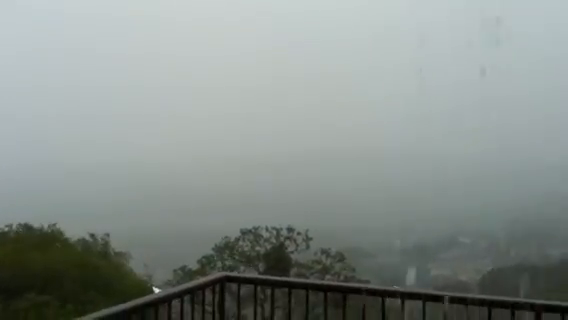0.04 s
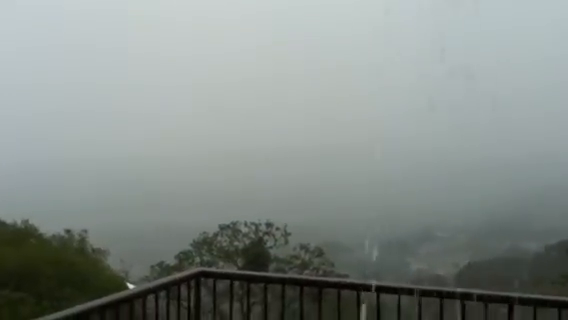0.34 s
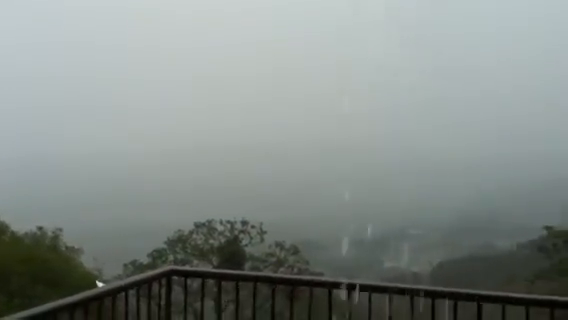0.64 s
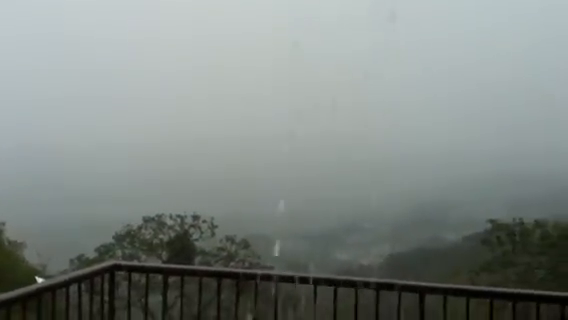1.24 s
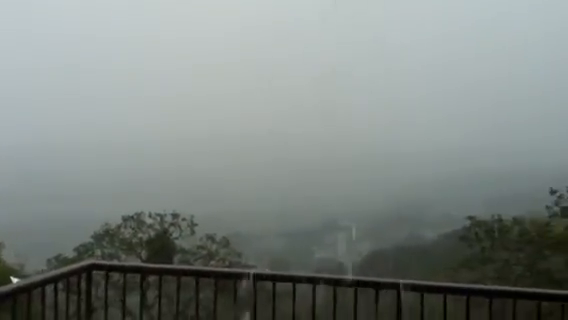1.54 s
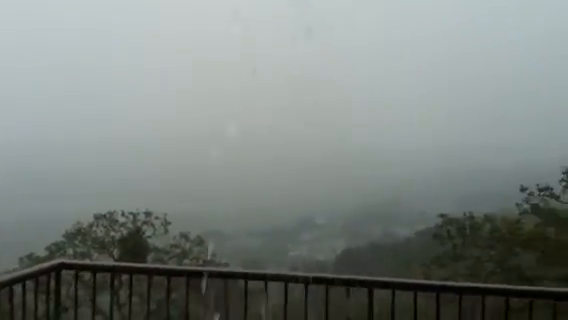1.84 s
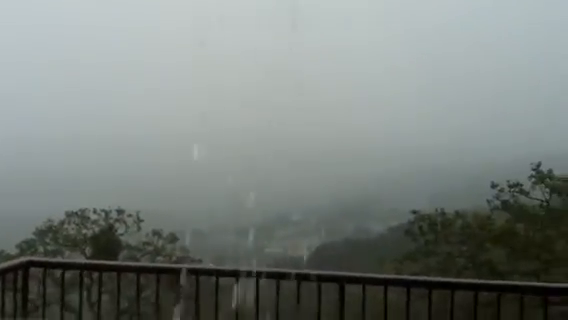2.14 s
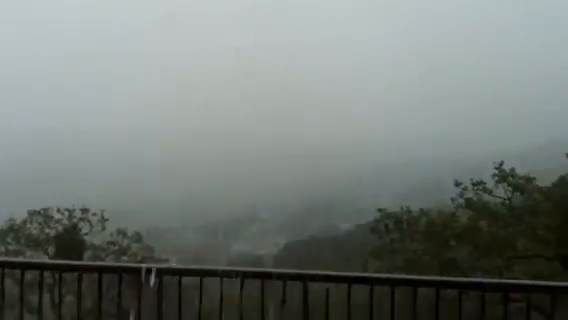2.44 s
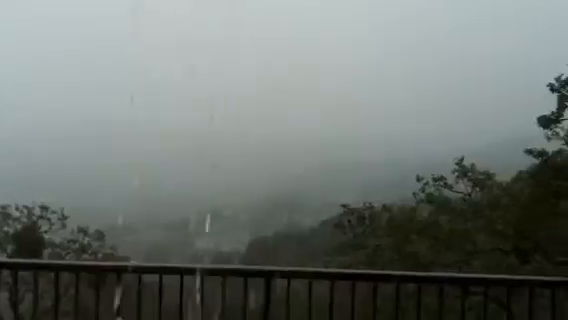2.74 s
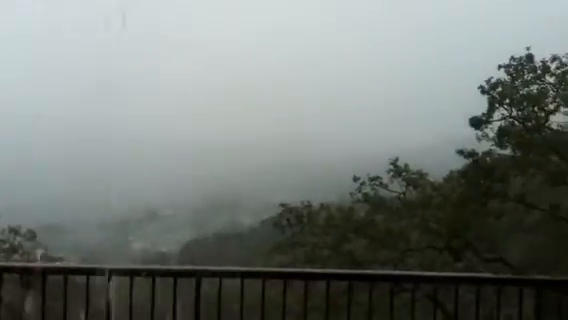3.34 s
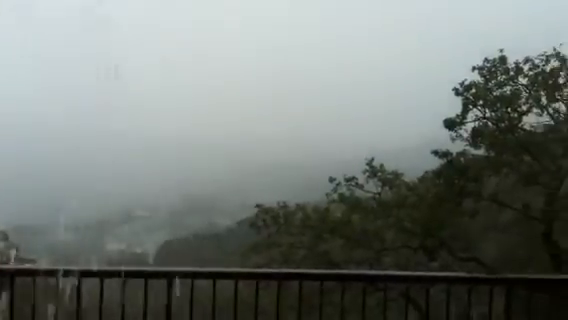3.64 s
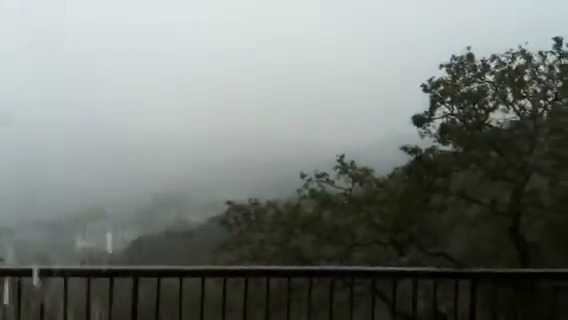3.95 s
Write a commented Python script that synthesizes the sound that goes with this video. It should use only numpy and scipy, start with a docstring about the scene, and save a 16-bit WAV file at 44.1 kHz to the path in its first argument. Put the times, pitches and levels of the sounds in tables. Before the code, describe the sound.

Heavy rain patters on a deck for the whole four seconds, heard from shelter over a steady hiss of distant rain on trees. Big close drops tick and slap irregularly, becoming a little thicker and heavier from about 3 seconds. A faint low rumble lies underneath, with a few soft, dull bumps, clearest around 0.3 and 3.8 seconds.

```python
"""Heavy rain patters on a wooden deck, heard from shelter; big close drops tick and slap among the small.
Each impact is a short damped tone and two bright bursts as the drop breaks up; big drops also throw spray.
The wall and roof add a brief echo. Behind lies the wash of far rain on trees, countless drops merged
into noise, with a low rumble and a few dull bumps. The treble colour shifts as the microphone turns."""
import sys
import numpy as np
from scipy import signal
from scipy.fft import rfft, irfft
from scipy.io import wavfile
from scipy.ndimage import uniform_filter1d, map_coordinates

SR = 44100
rng = np.random.default_rng(int(sys.argv[2]) if len(sys.argv) > 2 else 0)


def waveform_to_disk(signal):
    """Save audio, clipped to [-1, 1], as 16-bit WAV at the path in sys.argv[1]."""
    frames = np.transpose(np.atleast_2d(signal))
    scaled = np.clip(frames, -1, 1) * 32767
    samples = np.round(scaled).astype(np.int16)
    wavfile.write(sys.argv[1], SR, samples)


N = 176400


# How hard the rain falls: time_s, gain_db
RAIN_STRENGTH = [(0.0, -0.5), (0.06, -0.5), (0.18, 0.5), (0.33, 0.5), (0.39, -0.5), (0.42, 0.5), (0.54, -2),
                 (0.57, -0.7), (0.75, -1.5), (0.84, 1.5), (0.87, -3), (0.955, 3), (0.972, -6), (1.0, 0.5),
                 (1.06, 1.5), (1.11, -4.1), (1.23, 2.5), (1.26, -1.5), (1.41, 0.7), (1.5, -3), (1.59, 0.7),
                 (1.71, 2), (1.77, -2.5), (1.8, 1.5), (1.83, -1), (1.92, 0), (2.07, 0), (2.14, -1.5),
                 (2.22, -4), (2.3, -2.5), (2.49, -0.5), (2.52, -3), (2.55, -1.5), (2.7, -1.5), (2.76, -1.5),
                 (2.79, -1.2), (2.88, -3), (3.09, 2.5), (3.12, 0.8), (3.39, -1), (3.45, 1), (3.66, 1.5),
                 (3.72, 2), (3.78, -2), (3.87, -0.5), (4.0, 2)]
# Extra weight of the slap in the patter: time_s, gain_db
SLAP_GAIN = [(0, 1), (1, 0.5), (2.2, 0.5), (2.9, -1), (3.1, 2), (3.6, 3), (4, 2.5)]
# Base levels of a small drop: slap_db, tick_db, fizz_db
SMALL_DROP = [-49.5, -39.5, -36]

def patter(count=2000, size_spread_db=4, colour_spread_db=2.5, ceiling_db=9.5):
    """Shot noise: small drops of scattered size and colour strike the boards at independent times."""
    times = rng.uniform(0, N / SR, count)
    size_db = size_spread_db * rng.standard_normal((count, 1))
    colour_db = colour_spread_db * rng.standard_normal((count, 3))
    levels_db = SMALL_DROP + np.minimum(size_db + colour_db, ceiling_db)
    levels_db += curves_at(RAIN_STRENGTH, times)[0][:, None]
    levels_db[:, 0] += curves_at(SLAP_GAIN, times)[0]
    return impacts(times, levels_db)


# Big close drops and their relative levels: start_s, slap_db, tick_db, fizz_db
CLOSE_DROPS = [(0.0693, -42, -20.5, -20.5), (0.0777, -46, -25, -28), (0.131, -39, -18, -33),
               (0.2326, -38, -24, -27), (0.2443, -26.5, -21, -22), (0.256, -28, -26, -29),
               (0.293, -31, -30, -14), (0.3077, -44, -18, -34), (0.3127, -44, -25, -29),
               (0.322, -45, -18, -19), (0.3618, -42, -25.5, -30), (0.541, -37, -24.5, -22.5),
               (0.5824, -50, -23, -16), (0.6362, -49, -25.5, -26), (0.6587, -48, -27.5, -25),
               (0.7263, -53, -33, -31), (0.762, -56, -25, -25), (0.795, -41, -26, -32),
               (0.8313, -48, -20, -25), (0.9012, -27, -23.5, -26), (0.924, -34, -25, -30),
               (0.948, -25, -33, -29), (0.985, -28, -24.5, -24), (0.989, -47, -24, -24),
               (1.0526, -44, -24, -39), (1.074, -28, -23, -25), (1.0781, -35, -27, -30),
               (1.1941, -48, -26, -29), (1.2544, -38, -22.5, -37), (1.289, -28, -36, -24),
               (1.4212, -34, -29, -15.5), (1.4868, -31.5, -32, -28), (1.5793, -46, -24.5, -32),
               (1.6138, -32, -32, -21), (1.6613, -30, -23.5, -20), (1.7512, -40, -24, -33),
               (1.7272, -47, -22, -21), (1.7842, -44, -19.5, -34), (1.7894, -34, -25, -28),
               (1.911, -53, -40, -24), (1.9175, -56, -46, -18), (1.9274, -53, -44, -21),
               (2.0273, -33, -23.5, -25), (2.063, -43, -42, -19), (2.084, -36, -19, -19),
               (2.3478, -53, -23, -24.5), (2.3963, -36, -25, -31), (2.5152, -30, -26, -43),
               (2.6064, -46, -38, -25), (2.632, -43, -43, -20.5), (2.7287, -50, -28, -25),
               (2.759, -27.5, -22, -23.5), (2.8587, -33, -22.5, -22), (2.907, -29, -24, -18),
               (2.955, -38, -36, -29), (3.0076, -25, -28, -21), (3.0618, -27, -24.5, -21),
               (3.084, -48, -30, -33), (3.09, -31, -33, -28), (3.0973, -33, -28, -36),
               (3.1704, -31, -27, -24), (3.2378, -35, -23, -24), (3.269, -27, -27, -26),
               (3.3029, -28, -22.5, -28), (3.334, -50, -42, -22), (3.3389, -48, -29, -21),
               (3.3553, -46, -23, -31), (3.3692, -32.5, -19, -26), (3.4253, -42, -23, -30),
               (3.4294, -28, -22, -28), (3.4704, -42, -24, -20), (3.523, -48, -36, -18),
               (3.5306, -50, -41, -21), (3.538, -34, -28, -29), (3.552, -26.5, -27, -37),
               (3.6153, -19, -21.5, -26), (3.6195, -35, -25, -29), (3.639, -42, -23, -29),
               (3.6415, -30, -20.5, -33), (3.7078, -26, -20.5, -19), (3.7256, -26.5, -19.5, -38),
               (3.742, -33, -34, -22), (3.7937, -23.5, -25.5, -24), (3.856, -44, -23, -27),
               (3.869, -41, -22.5, -18.5), (3.8892, -42, -27, -25), (3.9022, -30.5, -31, -20),
               (3.922, -32, -31, -28), (3.9362, -53, -19, -29)]
# A spray droplet relative to its parent's row: slap_db, tick_db, fizz_db
SPRAY_GAIN = [-19.5, -19, -21]

def close_drops(droplets=16, mean_flight_s=0.012, hit_gain_db=-0.76):
    """Secondary impact: each big drop hits and throws up droplets, which land after a short flight."""
    drops = np.array(CLOSE_DROPS)
    parents = np.repeat(drops, droplets, axis=0)
    flight_s = mean_flight_s * rng.exponential(size=len(parents))
    hits = impacts(drops[:, 0], drops[:, 1:] + hit_gain_db, pitch_spread=0.034)
    spray = impacts(parents[:, 0] + flight_s, parents[:, 1:] + SPRAY_GAIN)
    return hits + spray


# The tick and the fizz of a drop breaking up: low_hz, high_hz, decay_s
BURST_BANDS = [(4084, 6700, 0.00018), (8200, 13730, 0.00044)]
SLAP_HZ, SLAP_RISE_S, SLAP_LEAD_S, BURST_RISE_S = 2090, 0.00036, 0.0003, 0.00008
HEAVY_FROM_DB, SAG_PER_DB = -29, 0.016  # louder slaps come from heavier drops and sound lower

def impacts(times, levels_db, pitch_spread=0.16):
    """Impact transients: a damped oscillation (the slap) leads two bursts of band-limited noise."""
    offsets = np.arange(160)
    t = offsets / SR
    starts = (np.maximum(times - SLAP_LEAD_S, 0) * SR).astype(int)
    samples = starts[:, None] + offsets
    sag = SAG_PER_DB * np.maximum(levels_db[:, :1] - HEAVY_FROM_DB, 0)
    detune, phase = np.hsplit(rng.standard_normal((len(times), 2)), 2)
    pitch_hz = SLAP_HZ * np.exp(pitch_spread * detune - sag)
    slap_envelope = t ** 2 * np.exp(-2 * t / SLAP_RISE_S)
    parts = [slap_envelope * np.sin(2 * np.pi * (pitch_hz * t + phase))]
    age = np.maximum(t - SLAP_LEAD_S, 0)
    for low_hz, high_hz, decay_s in BURST_BANDS:
        band = signal.butter(2, [low_hz, high_hz], 'bandpass', fs=SR, output='sos')
        envelope = (1 - np.exp(-age / BURST_RISE_S)) * np.exp(-age / decay_s)
        parts.append(signal.sosfilt(band, rng.standard_normal(samples.shape) * envelope))
    sound = np.zeros(samples.shape)
    for part, level_db in zip(parts, levels_db.T):
        rms = np.sqrt(np.sum(part ** 2, axis=1, keepdims=True) / (0.002 * SR))  # energy spread over 2 ms
        sound += part / rms * amp(level_db)[:, None]
    return np.bincount(samples.ravel(), sound.ravel(), N)[:N]


def shelter_echo(x, places=8, t60_s=0.042, gain_db=-4.5):
    """Diffuse reflection from wall and roof: drops land all over, so the decaying tail keeps changing."""
    t = np.arange(SR // 10) / SR
    place = (np.arange(N) // (SR // 50)) % places  # the next tail every 20 ms
    tails = rng.standard_normal((places, len(t))) * amp(-60 * t / t60_s)
    tails /= np.linalg.norm(tails, axis=1, keepdims=True)
    echoes = (signal.fftconvolve(x * (place == i), tail)[:N] for i, tail in enumerate(tails))
    return amp(gain_db) * sum(echoes)


# Relative spectrum of far rain on trees: frequency_hz, density_db
WASH_SPECTRUM = [(25, -44), (60, -38), (90, -15), (130, -10.5), (215, 1), (350, 3), (450, -0.5), (900, -1),
                 (2100, -6), (3200, -6), (4800, -3), (7000, -1), (11500, 0), (15500, -2)]

def far_wash(level_db=-31.5, patchy_db=1, treble_from_hz=1800):
    """Incoherent summation: countless far drops merge to a hiss, whose treble swells with the rain."""
    def swell_db(hz, t):
        patches = rng.standard_normal((len(hz), len(t)))
        patches = uniform_filter1d(patches, 5, axis=0)  # smooth across frequency
        patches = uniform_filter1d(patches, 16, axis=1)  # and across time
        treble = hz ** 2 / (hz ** 2 + treble_from_hz ** 2)
        return patchy_db * patches / patches.std() + treble * curves_at(RAIN_STRENGTH, t)[0]
    return amp(level_db) * recolour(coloured_noise(WASH_SPECTRUM), swell_db)


# Dull bumps before their bass is cut: start_s, peak_db, pitch_hz
DULL_BUMPS = [(.234, -27, 210), (0.251, -19, 225), (0.275, -28, 240), (0.445, -30, 146), (0.62, -30, 150),
              (.692, -28, 232), (0.83, -30, 141), (1.39, -32, 150), (2.457, -29.5, 218), (2.63, -32, 170),
              (3.719, -29, 325), (3.751, -24.5, 270), (3.797, -32, 210), (3.804, -23, 272),
              (3.86, -26, 193)]

def bumps(rise_s=0.0016, low_cut_hz=124):
    """Heavily damped oscillation: each soft knock dies within a cycle or two."""
    t = np.arange(N) / SR
    knocks = np.zeros(N)
    for start_s, peak_db, pitch_hz in DULL_BUMPS:
        age = np.maximum(t - start_s, 0)
        envelope = age / rise_s * np.exp(1 - age / rise_s)
        knocks += amp(peak_db) * envelope * np.sin(2 * np.pi * pitch_hz * age)
    return signal.sosfilt(signal.butter(2, low_cut_hz, 'highpass', fs=SR, output='sos'), knocks)


# Slow course of the rumble: time_s, level_db
RUMBLE_COURSE = [(0, -34.5), (.06, -49), (.25, -42.5), (.55, -46), (.7, -44), (.88, -41), (1.02, -53),
                 (2.3, -54.5), (2.5, -49), (3.4, -54), (3.7, -51), (3.8, -39.5), (4, -53)]
# Relative spectrum of the rumble: frequency_hz, density_db
RUMBLE_SPECTRUM = [(25, -30), (70, -27), (120, -1.5), (220, 0), (350, -11.5), (700, -27), (2000, -70)]

def rumble(lumps_db=2, lumps_per_s=26):
    """Amplitude modulation: low noise comes and goes, made lumpy by a smooth random curve."""
    t = np.arange(N) / SR
    lumps = map_coordinates(rng.standard_normal(400), [t * lumps_per_s], mode='wrap')
    level_db = curves_at(RUMBLE_COURSE, t)[0] + lumps_db * lumps
    return amp(level_db) * coloured_noise(RUMBLE_SPECTRUM)


def amp(db):
    """The decibel scale: 20 dB is a factor of ten in amplitude."""
    return 10 ** (np.asarray(db) / 20)


def curves_at(rows, t):
    """Linear interpolation: each value column of a table at the times t."""
    times, *columns = np.transpose(rows)
    return [np.interp(t, times, column) for column in columns]


def coloured_noise(spectrum):
    """Spectral shaping: white noise takes on the given spectrum and is scaled to an rms of 1."""
    knots_hz, knots_db = np.transpose(spectrum)
    hz = np.fft.rfftfreq(N, 1 / SR)
    gain_db = np.interp(np.log(hz + 1), np.log(knots_hz), knots_db)
    x = irfft(rfft(rng.standard_normal(N)) * amp(gain_db), N)
    return x / x.std()


def recolour(x, gain_db):
    """Time-varying filtering: each short-time spectrum is weighted by gain_db(hz, t)."""
    hz, t, spectra = signal.stft(x, SR, nperseg=256)
    return signal.istft(spectra * amp(gain_db(hz[:, None], t)), SR, nperseg=256)[1][:N]


def scene(close_echo_db=-3):
    """Superposition: all sources add at one microphone; close drops raise less echo than the patter."""
    small, close = patter(), close_drops()
    echo = shelter_echo(small + amp(close_echo_db) * close)
    return (small + close + echo + far_wash() + rumble() + bumps())[None]


# Colour of the turning microphone: time_s, hollow_hz, notch_hz, lower_peak_db, upper_peak_db
MICROPHONE_COLOUR = [(0, 3040, 6800, -3.5, -0.5), (1, 3140, 6950, -1.5, 4.5), (2, 3100, 7130, 0, 2.5),
                     (2.7, 3400, 7650, 3.5, 4), (3.3, 3580, 8200, 2, 1), (4, 3520, 9000, 2, 0)]

def record(dry, hollow_db=-3, notch_db=-5.5, low_cut_hz=47, top_hz=15900):
    """Directional response: turning moves two dips and varies two peaks of a band-limited microphone."""
    def colour_db(hz, t):
        def bell(centre_hz, width_hz):
            return np.exp(-0.5 * ((hz - centre_hz) / width_hz) ** 2)
        hollow_hz, notch_hz, lower_peak_db, upper_peak_db = curves_at(MICROPHONE_COLOUR, t)
        dips = hollow_db * bell(hollow_hz, width_hz=324) + notch_db * bell(notch_hz, width_hz=670)
        peaks = lower_peak_db * bell(11400, width_hz=820) + upper_peak_db * bell(14400, width_hz=820)
        return dips + peaks
    bass_cut = signal.butter(1, low_cut_hz, 'highpass', fs=SR, output='sos')
    coloured = signal.sosfilt(bass_cut, recolour(dry[0], colour_db))
    passband = np.fft.rfftfreq(N, 1 / SR) < top_hz
    return irfft(rfft(coloured) * passband, N)[None]


dry = scene()
out = record(dry)
waveform_to_disk(out)
```